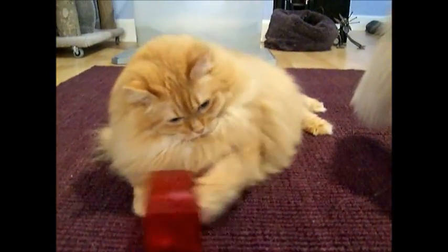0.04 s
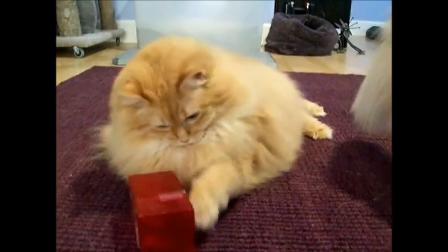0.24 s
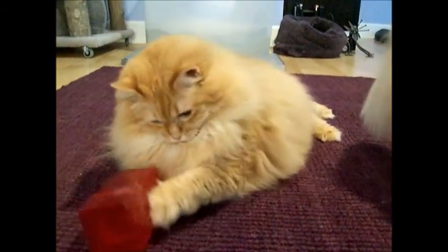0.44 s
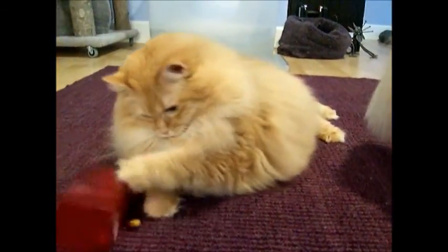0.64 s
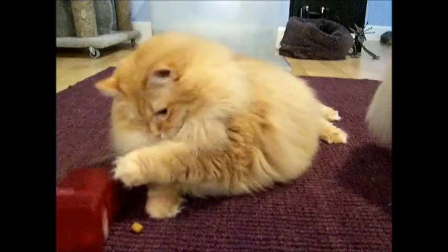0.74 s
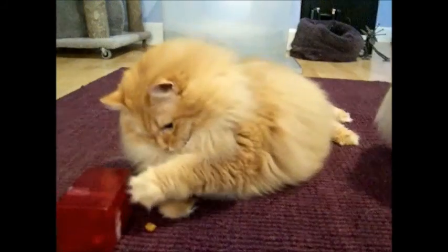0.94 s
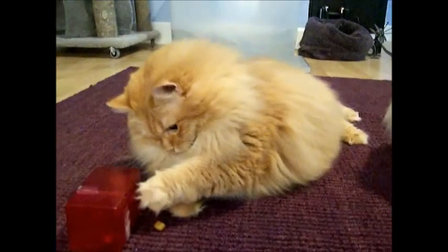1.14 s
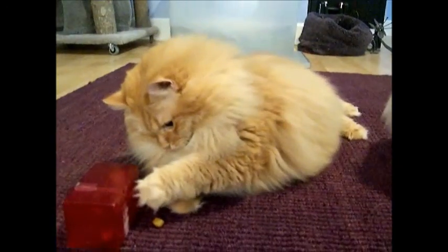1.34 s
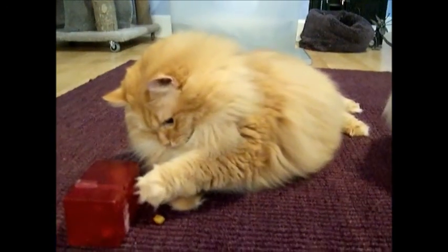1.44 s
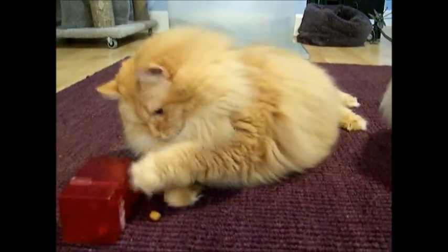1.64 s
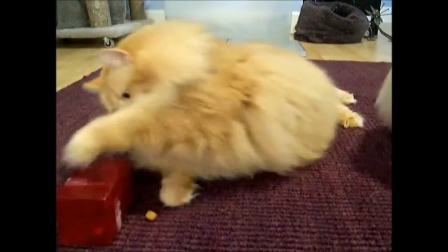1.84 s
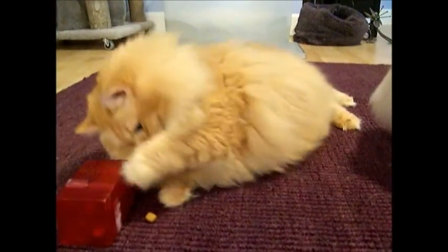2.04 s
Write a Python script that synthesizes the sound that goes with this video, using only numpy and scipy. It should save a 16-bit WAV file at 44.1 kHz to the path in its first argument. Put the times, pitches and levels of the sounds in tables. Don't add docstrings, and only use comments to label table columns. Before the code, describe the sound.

Hard plastic treat box clatters as dry pellets tumble inside, then settles to faint ticks

```python
import sys
import numpy as np
from scipy import signal
from scipy.fft import rfft, irfft
from scipy.io import wavfile
from scipy.ndimage import uniform_filter1d

SR = 44100
rng = np.random.default_rng(int(sys.argv[2]) if len(sys.argv) > 2 else 0)


def decibels_to_gain(level_db):
    exponent = np.asarray(level_db, float) / 20
    return 10 ** exponent


def persist_wave(psi):
    counts = np.round(np.clip(psi, -1, 1) * 32767).astype(np.int16)
    wavfile.write(sys.argv[1], SR, np.atleast_2d(counts).T)


N = 92874
COLOUR_HZ = (1200, 3000, 5800)


def unit(x):
    return x / np.sqrt(np.mean(x ** 2))


def band(x, hz, width):
    return signal.lfilter(*signal.iirpeak(hz, hz / width, SR), x)


def curve(rows):
    rows = np.array(rows)
    return decibels_to_gain(np.interp(np.arange(N) / SR, rows[:, 0], rows[:, 1], left=-150, right=-150))


def room_tone():
    # pitch_hz, density_db (per Hz)
    spectrum = [(15, -33), (25, 5.5), (123, -4), (375, -16.5), (443, -10.5), (476, -28.5), (766, -11),
                (994, -29), (7320, -44), (9520, -72), (16100, -120)]
    level_db, alike_hz = -42, 1100
    out, rows = 0, np.array(spectrum)
    for hz in 28 * 2 ** np.arange(0, 8.2, .5):
        noise = rng.standard_normal((3, N))
        mid, left, right = band(band(noise, hz, hz / 2), hz, hz / 2)
        alike = 0.74 / (1 + (hz / alike_hz) ** 2)
        drift = uniform_filter1d(rng.standard_normal(N), size=3000)
        flicker = unit(uniform_filter1d(drift, size=3000))
        db = np.interp(np.log(hz), np.log(rows[:, 0]), rows[:, 1]) + 2 * flicker
        sides = np.array([left, right])
        out = out + decibels_to_gain(db) * (np.sqrt(alike) * mid + np.sqrt(1 - alike) * sides)
    return unit(out) * decibels_to_gain(level_db)


def appliance_hum():
    # pitch_hz, level_db, width_hz
    partials = [
        (126.1, -56.5, 4.2),
        (550, -61.5, 40),
        (782, -62.5, 9.2),
        (1343, -66, 24),
    ]
    mains_hz, mains_db = 120, -45.5
    out = decibels_to_gain(mains_db) * np.sin(2 * np.pi * mains_hz * np.arange(N) / SR)
    for hz, db, width in partials:
        out += decibels_to_gain(db) * unit(band(rng.standard_normal(N), hz, width))
    return out


def loose_rattle():
    # start_s, level_db
    loudness = [
        (0.0, -30),
        (0.118, -41),
        (0.412, -40),
        (0.478, -43),
        (0.682, -40),
        (0.72, -38.5),
        (0.856, -43.5),
        (1.0, -58.5),
    ]
    rate_per_s, spread_db, level_db = 300, 11.5, -1.5
    tint_db, treble_db = 4, -3.5
    t = np.cumsum(rng.exponential(1, 900)) / rate_per_s
    db = np.interp(t, *np.array(loudness).T) + level_db + spread_db * rng.random(900) ** 2
    low, high = tint_db * rng.standard_normal((900, 2)).T
    return np.stack([t, db, low, high + treble_db], axis=1)[t < loudness[-1][0]]


def tinted_db(hits, hz):
    tilt = [np.interp(np.log(hz), np.log(COLOUR_HZ), (low, 0, high)) for low, high in hits[:, 2:4]]
    return hits[:, 1] + np.array(tilt)


def wall_rings(hits, at):
    # pitch_hz, level_db, t60_s
    walls = [(810, -18.5, 0.11), (1003, 4, 0.043), (1197, 1, 0.032), (1312, -4.5, 0.065), (1529, -9, 0.082),
             (1820, -5.5, 0.084), (2132, -6.5, 0.038), (2430, -4, 0.029), (2771, -2, 0.027),
             (3108, -0.5, 0.015), (3598, 1, 0.025), (4198, -3.5, 0.011), (5050, 0.5, 0.03),
             (5810, 2.5, 0.0087)]
    contact_s, ring_db, scatter_db, detune_share, longest_cycles = .0012, -6, 1.5, .03, 120
    t, rings = np.arange(2000) / SR, 0
    for hz, db, t60 in walls + walls:
        scatter, detune, late = rng.standard_normal((3, len(hits), 1))
        age = np.maximum(t - contact_s * np.abs(late), 0).astype(np.float32)
        level = tinted_db(hits, hz)[:, None] + db + ring_db + scatter_db * scatter
        size = decibels_to_gain(level) * np.sign(detune * late) * .5
        turns = (2 * np.pi * hz * (1 + detune_share * detune)).astype(np.float32)
        decay = np.float32(-np.log(1000) / min(t60, longest_cycles / hz))
        rings = rings + size * (np.exp(decay * age) * np.sin(turns * age))
    places = at[:, None] + np.arange(len(t))
    return np.bincount(places.ravel(), rings.ravel(), 2 * N)[:N]


def cracks(hits, at):
    crack_db, t60_s, apart = -3, 0.017, 0.25
    fall = np.exp(-np.log(1000) / (t60_s * SR))
    out = 0
    for hz in COLOUR_HZ:
        impulses = np.bincount(at, decibels_to_gain(tinted_db(hits, hz) + crack_db), N)
        env = signal.lfilter([1], [1, -fall], impulses)
        env = uniform_filter1d(env, size=30, origin=14)
        spray = rng.standard_normal(N) + apart * rng.standard_normal((2, N))
        out = out + band(env * spray, hz, 0.46 * hz)
    return out


def pellets():
    # start_s, peak_db, low_walls_db,
    # treble_db
    strikes = [(0.012, 2, -38, 2), (0.024, -35.5, -27, -10), (0.046, -31, -15, -28), (0.061, -16, 0, -20),
               (0.092, -1, -24.5, -6.5), (0.102, -10, -4.5, -27), (0.16, 1, -35, -15),
               (0.22, -12, -5.5, -10.5), (0.272, -21, -28, 1), (0.299, -17, -2, -24.5),
               (0.318, -14.5, -9.5, -9.5), (0.333, -15, -16.5, -3.5), (0.353, -13, -15.5, -21.5),
               (0.381, -17, -1.5, -18.5), (0.4, -11, -16, -26.5), (0.413, -19.5, 0.5, -12.5),
               (0.446, -9.5, -13, -38.5), (0.482, -17.5, -4, -30), (0.507, -12, -12, -35),
               (0.525, -20.5, -6, -35.5), (0.578, -2, -15, 0.5), (0.595, -21, -17, -9),
               (0.603, -12, -12, -21.5), (0.646, -5.5, -25, -6.5), (0.672, -3.5, -17, -4),
               (0.758, -7.5, -25, -30.5), (0.772, -5.5, -10.5, -12.5), (0.814, -10.5, -4, -7),
               (0.865, -22.5, 1.5, -4.5), (1.012, -20.5, -9.5, -23),
               (0.269, -23, -7.5, -14.5), (0.474, -29, -8, -26), (0.687, -15, -32.5, -19),
             (0.78, -11.5, -20, -23), (0.799, -14.5, -15, -17), (0.977, -52, -15.5, -12.5),
             (1.007, -32, -18.5, -26), (1.062, -32.5, -4.5, -44.5), (1.148, -37.5, -4, -35),
             (1.159, -37.5, 0.5, -35), (1.271, -44.5, -27, 0.5), (1.409, -71, -5.5, -9),
             (1.701, -55, -11, 18)]
    low_hz, top_hz = 740, 6320
    hits = np.vstack([np.array(strikes, float), loose_rattle()])
    at = np.clip((hits[:, 0] * SR).astype(int), 0, N - 1)
    out = wall_rings(hits, at) + cracks(hits, at)
    return signal.sosfilt(signal.butter(3, (low_hz, top_hz), "band", fs=SR, output="sos"), out)


def rug_thumps():
    # start_s, level_db, pitch_hz, t60_s
    landings = [(.004, -20.5, 214, 0.044), (.011, -6, 550, 0.01), (.3, -41, 583, 0.1),
                (.42, -39, 438, 0.15), (0.483, -29.5, 99, 0.034), (0.522, -28.5, 356, 0.04),
                (0.577, -35, 382, 0.13), (0.662, -22, 86, 0.082), (0.758, -36.5, 333, 0.1),
                (0.814, -21.5, 296, 0.018), (0.972, -39, 249, 0.075), (1.01, -37.5, 300, 0.026),
                (1.405, -33.5, 377, 0.071), (1.512, -39, 67, 0.033), (1.698, -28, 240, 0.034)]
    attack_s = 0.0026
    t, out = np.arange(N) / SR, np.zeros(N)
    for s, db, hz, t60 in landings:
        age = np.maximum(t - s, 0)
        env = decibels_to_gain(db) * (1 - np.exp(-age / attack_s)) * decibels_to_gain(-60 * age / t60)
        thud = unit(band(rng.standard_normal(N), 1.69 * hz, 1.1 * hz))
        out += env * (np.sin(2 * np.pi * hz * age) + 0.66 * thud)
    return out


def rug_squeaks():
    # start_s, length_s, level_db, pitch_hz
    slides = [
        (0.335, .12, -42.5, 264.6),
        (1.218, 0.037, -46.5, 422),
        (1.259, 0.062, -39.5, 423.5),
    ]
    sag = 0.14
    t, out = np.arange(N) / SR, np.zeros(N)
    for s, length, db, hz in slides:
        u = np.clip((t - s) / length, 0, 1)
        wobble = 1 + 0.29 * unit(band(rng.standard_normal(N), 60, 60))
        tone = np.sin(2 * np.pi * hz * length * u * (1 - sag * u / 2))
        out += decibels_to_gain(db) * np.sin(np.pi * u) * wobble * tone
    return out


def fur_brush():
    # start_s, level_db
    strokes = [
        (1.19, -78),
        (1.25, -48.5),
        (1.32, -53.5),
        (1.37, -56),
        (1.41, -50),
        (1.47, -54.5),
        (1.6, -74.5),
    ]
    grain = decibels_to_gain(2 * unit(uniform_filter1d(rng.standard_normal(N), size=300)))
    hiss = band(rng.standard_normal((2, N)), 5500, 5400)
    return curve(strokes) * unit(grain * hiss)


def claw_ticks():
    # start_s, level_db, pitch_hz
    catches = [
        (1.27, -44.5, 6200),
        (1.272, -54, 4100),
        (1.41, -43, 3700),
        (1.505, -54, 4930),
        (1.556, -55, 4940),
        (1.655, -52.5, 5000),
        (1.701, -49, 5050),
        (1.74, -56, 5000),
        (1.925, -55, 4920),
    ]
    t60_s = 0.031
    t, out = np.arange(N) / SR, np.zeros(N)
    for s, db, hz in catches:
        age = np.maximum(t - s, 0)
        out += decibels_to_gain(db - 60 * age / t60_s) * np.sin(2 * np.pi * hz * age)
    return out


def room_tail(near):
    level_db, t60_s, dull_hz = -15, .25, 3460
    age = np.arange(int(.4 * SR)) / SR
    tail = rng.standard_normal((2, len(age))) * decibels_to_gain(-60 * age / t60_s) * (age > .004)
    clumps = unit(uniform_filter1d(rng.standard_normal(len(age)), size=120))
    tail = tail * decibels_to_gain(3.7 * clumps)
    tail = signal.lfilter(*signal.butter(1, dull_hz, fs=SR), tail)
    tail /= np.sqrt((tail ** 2).sum(axis=1, keepdims=True))
    return decibels_to_gain(level_db) * signal.fftconvolve(near, tail, axes=1)[:, :N]


def scene():
    near = pellets() + rug_thumps() + rug_squeaks() + fur_brush() + claw_ticks()
    return near + room_tail(near) + room_tone() + appliance_hum()


def microphone_ports(dry):
    # pitch_hz, sharpness (Q), gain_db, bump_hz, bump_width_hz, bump_db
    openings = [
        (5640, 6.83, -3, 4060, 1600, -4.5),
        (3300, 1.78, -0.5, 5240, 1173, 12),
    ]
    right_late_s = .00002
    f = np.fft.rfftfreq(2 * N, 1 / SR)
    ports = []
    for hz, q, db, bump_hz, width, bump_db in openings:
        bump = bump_db * np.exp(-((f - bump_hz) / width) ** 2)
        ports.append(decibels_to_gain(db + bump) / (1 - (f / hz) ** 2 + 1j * f / (hz * q)))
    late = np.exp(-2j * np.pi * f * np.array([[0], [right_late_s]]))
    return irfft(rfft(dry, 2 * N) * np.array(ports) * late)[:, :N]


def roll_off(x):
    return signal.sosfilt(signal.butter(12, 7470, fs=SR, output="sos"), x)


def record(dry):
    hiss_db, top_hz = -53.5, 7500
    x = microphone_ports(dry) + decibels_to_gain(hiss_db) * rng.standard_normal((2, N))
    x = signal.sosfilt(signal.cheby1(8, 1, top_hz, fs=SR, output="sos"), x)
    return roll_off(np.clip(x, -1, 1))


dry = scene()
out = record(dry)
persist_wave(out)
```